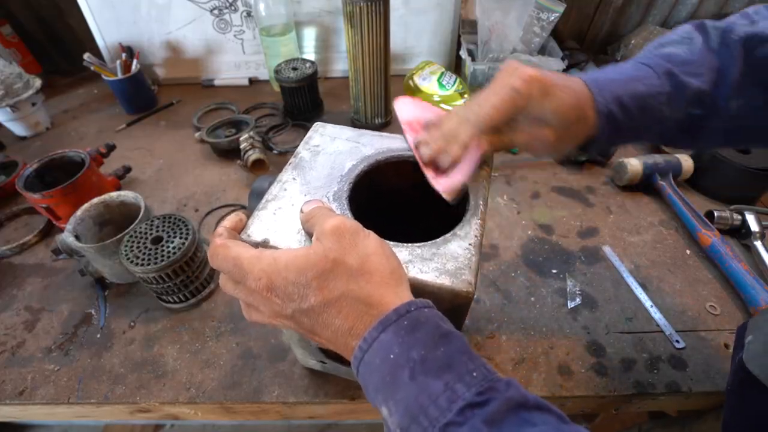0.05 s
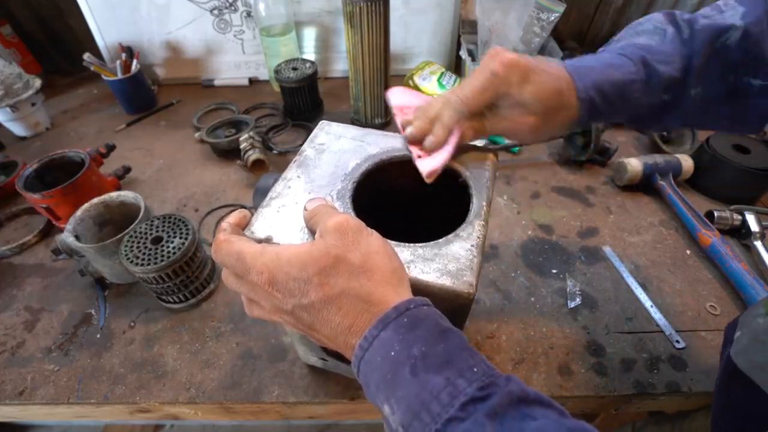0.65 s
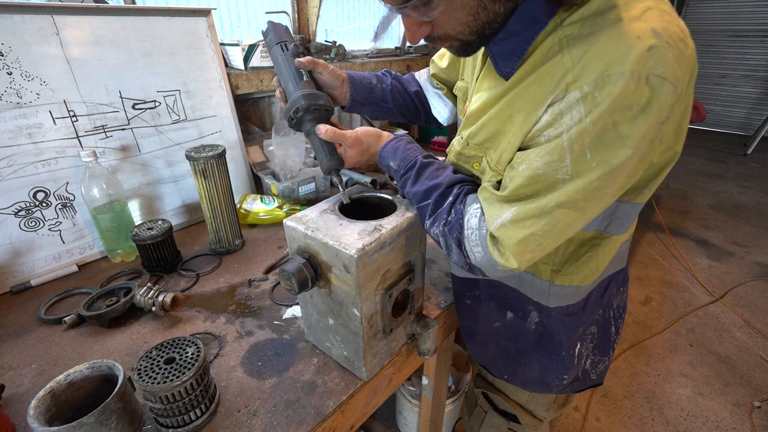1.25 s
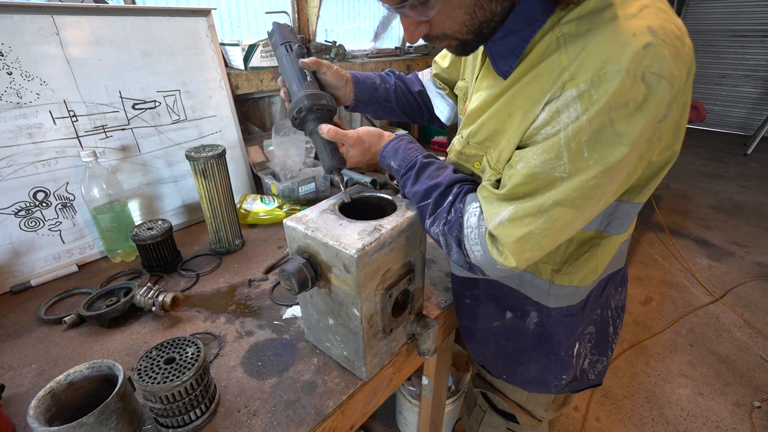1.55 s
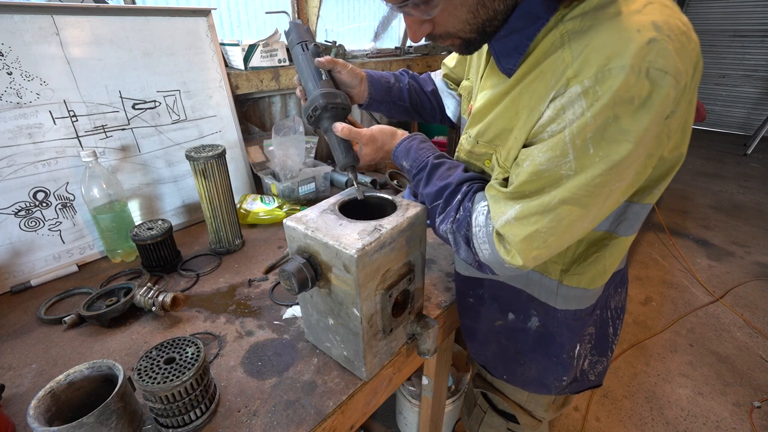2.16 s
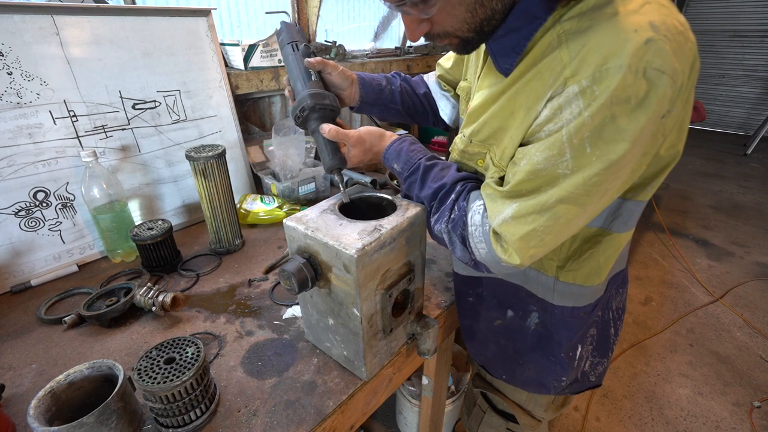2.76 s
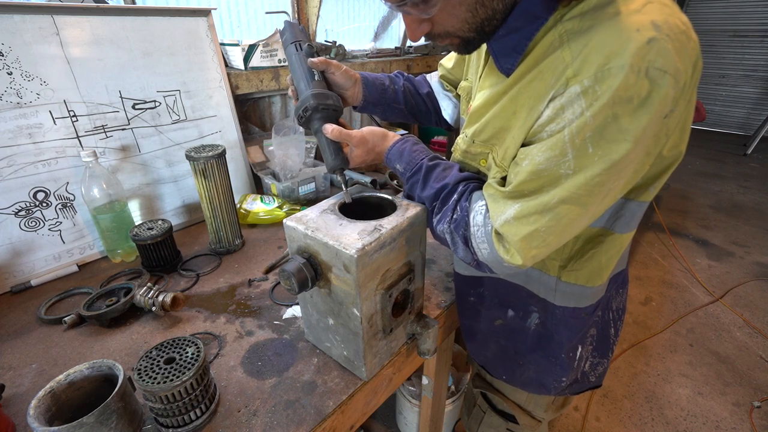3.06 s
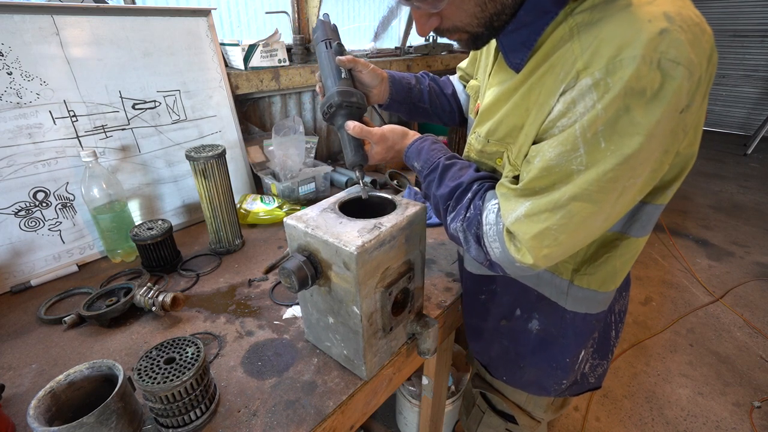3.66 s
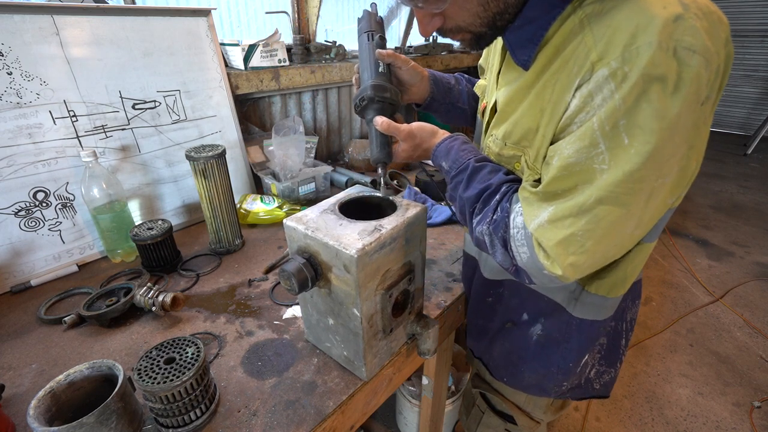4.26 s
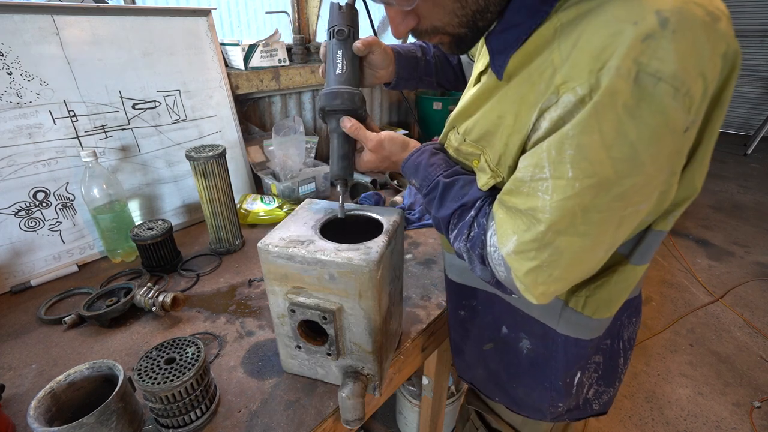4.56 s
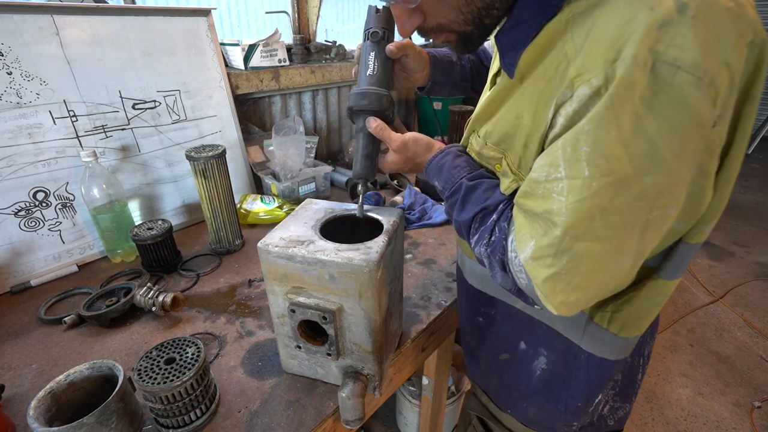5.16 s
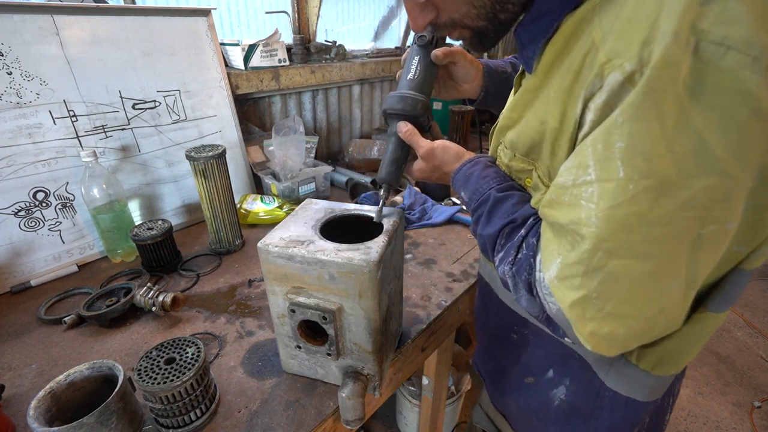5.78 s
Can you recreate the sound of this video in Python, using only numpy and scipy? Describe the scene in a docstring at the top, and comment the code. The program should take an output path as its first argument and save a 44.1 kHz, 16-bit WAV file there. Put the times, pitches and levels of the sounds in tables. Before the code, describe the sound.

Fast, hissing scrubbing on metal with a few knocks cuts abruptly to a small grinder's steady whine, with shrill ringing and chatter.

```python
"""A workshop: an abrasive pad scrubs a hollow aluminium casting in quick strokes as it knocks on the bench.
Then, abruptly, a die grinder works the rim. Its shaft hums and sags under load; the bit strikes once
a turn, makes the walls sing, tears off chips and at times chatters or squeals. Cooling air hisses from
the motor. Late on, the sound cuts abruptly to later, slightly louder grinding. The shop murmurs below."""
import sys
import numpy as np
from scipy import signal
from scipy.fft import rfft, irfft
from scipy.io import wavfile

SR = 44100
rng = np.random.default_rng(int(sys.argv[2]) if len(sys.argv) > 2 else 0)


def pcm_store(signal):
    """Save signal as 16-bit PCM."""
    levels = np.round(np.clip(np.atleast_2d(signal), -1, 1) * 32767)
    wavfile.write(sys.argv[1], SR, levels.astype(np.int16).T)


N = 260983
TIME = np.arange(N) / SR
GRINDER_START_S, CUT_S = 1.125, 4.344
MAINS_RIPPLE_HZ = 100

# Lines of the strike. Each row: shaft multiple, relative level in dB.
STRIKE_LINES = [(2, -39.5), (3, -45), (4, -42.5), (5, -37.5), (6, -41), (7, -36.5), (8, -31), (9, -32),
                (10, -36), (11, -34), (12, -33), (13, -39)]
# Wall rings. Each row: start and end in seconds, driving shaft multiple, relative level in dB.
WALL_RINGS = [(1.6, 1.827, 5, -29), (1.607, 1.903, 9, -19.5), (1.71, 1.978, 6, -27), (1.8, 2.44, 4, -35),
              (1.993, 2.44, 3, -35.5), (2.0, 2.78, 7, -32), (2.38, 2.76, 11, -24), (2.528, 2.807, 9, -19.5),
              (2.984, 3.633, 9, -21), (3.196, 3.62, 8, -24.5), (3.46, 3.815, 5, -21.5),
              (3.755, 4.334, 2, -33), (4.3, 4.674, 3, -29), (4.3, 4.7, 8, -31.5), (4.456, 5.0, 13, -23),
              (4.76, 4.982, 5, -26.5), (4.82, 4.955, 10, -20.2), (4.83, 5.3, 9, -26.5),
              (4.98, 5.25, 4, -33), (5.423, 5.674, 11, -22)]

def singing_rim(shaft):
    """The bit strikes once a turn, giving a stack of lines; a driven wall lifts one into a shrill ring."""
    touch_db = np.interp(TIME, [1.55, 1.75], [-6, 0])
    bouncing = np.minimum(sum(window(start, end, edge_s=0.035) for start, end, _, _ in BOUNCE_RUNS), 1)
    after_cut = TIME >= CUT_S  # strike 1 dB louder from here
    strike_db = 1.14 * bite_db() + touch_db - 3.5 * bouncing + after_cut - 2.5
    torque_ripple = 0.0079 * np.sin(2 * np.pi * MAINS_RIPPLE_HZ * TIME)
    skid = 0.032 * walk(27) + 0.01 * walk(200)
    contact = shaft + torque_ripple + skid
    rings, out = [], 0
    for start, end, sung, db in WALL_RINGS:
        same_side = after_cut == ((start + end) / 2 > CUT_S)  # no ring crosses the cut
        growth_db = np.interp(TIME, [start, end], [-1.75, 1.75])
        rings.append((round(sung), same_side * undb(db + growth_db) * window(start, end, edge_s=0.082)))
    for multiple, db in STRIKE_LINES:
        k = round(multiple)
        strike = undb(db + strike_db + 2 * walk(4.9) + 3.3 * walk(19))
        # a ring also lifts both neighbours, 16 dB weaker
        ring_power = sum((gain * undb(-16 * abs(sung - k))) ** 2
                         for sung, gain in rings if abs(sung - k) <= 1)
        power = strike ** 2 + ring_power * undb(2 * walk(25)) ** 2
        out += np.sqrt(2 * power) * np.sin(k * contact + rng.uniform(0, 2 * np.pi))
    return out

# Bit bouncing. Each row: start and end in seconds, bounce rate in Hz, relative level in dB.
BOUNCE_RUNS = [(2.33, 2.53, 120, -28.5), (3.556, 3.766, 127, -28), (3.754, 3.928, 112, -25.5),
               (3.935, 4.23, 112.3, -30.5), (4.504, 4.602, 102.4, -26.5), (5.22, 5.68, 105.8, -34.5),
               (5.68, 5.95, 106.9, -30)]
# Wall modes. Each row: frequency in Hz, width in Hz, gain in dB.
WALL_MODES = [(906, 29, 9), (1654, 39, 15.5), (1913, 66, 8.5), (2470, 73, 7), (2660, 50, 12.5),
              (3230, 9.5, 18), (3950, 130, 5), (4670, 380, 9), (5630, 330, 9.5), (6320, 100, 8.5),
              (6450, 120, -1), (9800, 200, 3)]

def chatter(shaft):
    """Bouncing modulates the strikes: side tones flank every line and rattle the walls."""
    contact = shaft + 0.05 * walk(30)
    strikes = sum(np.cos(k * contact + rng.uniform(0, 2 * np.pi)) for k in range(1, 20))
    wander, bounces = 0.011 * walk(11.4), 0
    for start, end, hz, db in BOUNCE_RUNS:
        bounce = phase(hz * (1 + wander))
        pulse = np.cos(bounce) + 0.5 * np.cos(2 * bounce)
        bounces += undb(db) * window(start, end, edge_s=0.047) * pulse
    rattle = resonate(strikes * bounces * undb(2.5 * walk(11)), WALL_MODES)
    return undb(4.5) * rattle / np.std(resonate(strikes, WALL_MODES))

# Bit on a sharp edge. Each row: start and end in seconds, relative level in dB.
SHARP_EDGES = [(2.37, 2.747, -46.5), (3.126, 3.5, -46.5), (3.75, 3.953, -47), (4.7, 5.7, -49),
               (5.873, 6, -37)]

def squeal(shaft):
    """A sharp edge hardens the strike and lifts its highest lines."""
    gain = undb(bite_db() - 54)
    for start, end, db in SHARP_EDGES:
        gain += undb(db) * window(start, end, edge_s=0.015)
    contact, lines = shaft + 0.016 * walk(30), 0
    for multiple in range(14, 31):
        db = 1 - 1.15 * max(multiple - 20, -3) + 3.5 * walk(8)
        lines += undb(db) * np.sin(multiple * contact + rng.uniform(0, 2 * np.pi))
    return gain * lines

# Rasp of the chips. Each row: frequency in Hz, gain in dB.
RASP_SPECTRUM = [(400, -28), (750, -15), (950, 3), (1300, -6), (2600, 0.5), (3300, 1.5), (4200, 8),
                 (5600, 6.5), (6600, 4.5), (7300, -1.5), (8800, 3.5), (10500, -22), (16000, -31)]

def rasp(shaft):
    """Chips tear off in a burst on every turn."""
    chips = grit(per_second=14000, spread_db=3) * (1 + 0.5 * np.cos(shaft))
    return colour(chips, RASP_SPECTRUM) * undb(bite_db() - 27 + walk(36))

# Hand easing off. Each row: centre in seconds, half length in seconds, depth in dB.
HAND_EASES = [(2.877, 0.39, 2.5), (3.663, .14, 2), (4.017, .08, 6.5), (4.294, 0.085, 8.5),
              (4.933, 0.12, 1.5), (5.495, 0.1, 2.5), (5.92, 0.079, 2)]

def bite_db():
    """The bit sinks in from a light touch, then holds except where the hand eases off."""
    held = np.interp(TIME, [1.35, 2], [1, 4.5])
    return held - sum(db * np.exp(-((TIME - at) / half_s) ** 2) for at, half_s, db in HAND_EASES)

# Shaft speed, sagging under load. Each row: time in seconds, turns per second.
SHAFT_SPEED = [(1.62, 530.5), (2.15, 523.4), (2.65, 518.7), (3.12, 517.8), (3.58, 514.1), (3.78, 510.0),
               (4.342, 506.3), (4.346, 521.8), (4.7, 519.7), (4.95, 515.1), (5.4, 509.4), (5.92, 506.8)]
# Shaft hum before the cut. Each row: time in seconds, level in dB.
HUM_BEFORE_CUT = [(1.15, -34.5), (2.14, -31), (2.21, -37), (3.22, -36.5), (3.48, -52.5), (3.9, -43.5),
                  (3.99, -62), (4.15, -45), (4.32, -42)]
# Shaft hum after the cut. Each row: time in seconds, level in dB.
HUM_AFTER_CUT = [(4.37, -32.5), (4.938, -38), (4.976, -45.5), (5.436, -39), (5.64, -51), (5.678, -39),
                 (5.918, -39.5)]

def motor(shaft):
    """The unbalanced shaft hums; its overtones and the commutator whine weaken under load."""
    hum_db = np.where(TIME < CUT_S, curve(HUM_BEFORE_CUT), curve(HUM_AFTER_CUT))
    overtones = undb(-38.5) * sum(np.sin(k * shaft) for k in (3, 6, 9))
    whine = undb(-40.5 + 2.5 * walk(12)) * np.sin(24 * shaft)
    free_running = np.interp(curve(SHAFT_SPEED), [510, 530], [0.55, 1])
    return np.sqrt(2) * (undb(hum_db) * np.sin(shaft) + free_running * (overtones + whine))

# Vent hiss, dipping as the grinding gets loud. Each row: time in seconds, relative level in dB.
HISS_LEVEL = [(1.13, -29), (1.7, -28.5), (2.2, -31), (4.2, -32.5), (4.7, -31.5), (5.9, -31.5)]
# Vent hiss. Each row: frequency in Hz, gain in dB.
VENT_SPECTRUM = [(250, -24), (450, -14.5), (640, -10), (800, -10.5), (950, -6.5), (1550, -2.5), (2100, -7),
                 (3000, -3), (4000, -12.5), (4900, -1), (6200, -1.5), (7300, -3.5), (8600, 0.5),
                 (10500, -9), (13000, -14), (16000, -21)]

def cooling_air():
    """The fan blows air that throbs with the mains."""
    ripple = 1 + 0.12 * np.sin(2 * np.pi * MAINS_RIPPLE_HZ * TIME)
    return colour(noise(), VENT_SPECTRUM) * undb(curve(HISS_LEVEL) + 8) * ripple

# Arm pressure. Each row: time in seconds, relative level in dB.
ARM_PRESSURE = [(0, -11.5), (.58, -11), (.69, -13.5), (.78, -11.5), (.97, -11.5), (1.06, -14.5)]
# Grit catching an edge. Each row: start in seconds, relative level in dB.
GRIT_CATCHES = [(.04, -12), (0.482, -13)]
# Pad hiss. Each row: frequency in Hz, gain in dB.
PAD_SPECTRUM = [(500, -45), (1000, -25), (1700, -22), (3000, -8.5), (3800, 0.5), (4600, 2.5), (6100, 2.5),
                (7200, -3.5), (8900, -0.5), (10500, -8.5), (13300, -8.5), (16000, -20)]
# Rub of the pad's backing. Each row: frequency in Hz, gain in dB.
BACKING_SPECTRUM = [(200, -3), (400, -4), (620, -7), (1000, -2), (1350, -4.5), (1700, 3.5), (2700, 0),
                    (4000, 1), (9000, -15), (16000, -30)]
# Modes of the hand-held casting. Each row: frequency in Hz, width in Hz, gain in dB.
CASTING_MODES = [(722, 7.5, -3), (827, 6.6, 0.5), (925, 14, 0.5), (1206, 6.1, 0.5), (1535, 27, -4),
                 (1690, 11, -1), (2590, 120, -4)]

def scrubbing(stroke_s=0.069, period_s=0.0936, return_lag_s=0.0098):
    """Each stroke drags hissing grit over the metal; a dull rub and the casting's ring carry on between."""
    k = np.arange(12)
    centres_s = 0.027 + k * period_s + k % 2 * return_lag_s
    strokes = sum(window(at - stroke_s / 2, at + stroke_s / 2, edge_s=0.033) for at in centres_s)
    drag = undb(-14 - 7 * TIME)
    force = np.maximum(drag, undb(curve(ARM_PRESSURE)) * strokes)
    for start, db in GRIT_CATCHES:
        force += undb(db) * fade(start, decay_s=0.0063)
    scrape = grit(per_second=24000, spread_db=-0.5) * force * undb(0.81 * walk(59))
    hiss = undb(-3.5) * colour(scrape, PAD_SPECTRUM) * np.std(scrape)
    friction = noise() * np.sqrt(force) * undb(-2.5 * TIME)
    rub = undb(-15.5) * colour(friction, BACKING_SPECTRUM) * np.std(friction)
    return hiss + rub + undb(-4.5) * resonate(friction, CASTING_MODES)

# Casting tipping onto the bench. Each row: start in seconds, thud drive in dB, clang drive in dB.
BENCH_KNOCKS = [(.005, -22, -28), (0.061, -22, -9.5), (.122, -9, -25), (.239, -19, -7.5), (.304, -20, -29),
                (0.483, -12, -32)]
# Bench top modes. Each row: frequency in Hz, width in Hz, gain in dB.
BENCH_MODES = [(193, 20, -3.5), (224, 25, -1), (487, 18, -11.5)]

def bench(rebound_s=0.036, loss_db=4.5):
    """The casting clangs, thuds and rocks on the wooden top."""
    thud_drive = sum(undb(db - k * loss_db) * fade(start + k * rebound_s, decay_s=0.0092)
                     for start, db, _ in BENCH_KNOCKS for k in range(3))
    clang_drive = sum(undb(db) * fade(start, decay_s=0.011) for start, _, db in BENCH_KNOCKS)
    thuds = undb(22) * resonate(noise() * thud_drive, BENCH_MODES)
    clangs = undb(16.5) * resonate(noise() * clang_drive, CASTING_MODES[:4])
    return thuds + clangs

# Low rumble. Each row: frequency in Hz, gain in dB.
RUMBLE_SPECTRUM = [(8.8, -32), (15, 9), (32, 9.5), (101, -8), (178, 4), (222, -0.5), (258, 4), (284, -12),
                   (400, -21), (520, -39), (880, -120)]

def rumble():
    """Low handling or wind rumble under the scrubbing."""
    return undb(-34.5) * colour(noise(), RUMBLE_SPECTRUM)

# Machine hums. Each row: start and end in seconds, frequency in Hz, level in dB.
MACHINE_HUMS = [(1.1, 4.33, 47, -63.5), (4.34, 8.1, 85, -62.5), (4.34, 6, 160, -70)]
# Shop murmur. Each row: frequency in Hz, gain in dB.
MURMUR_SPECTRUM = [(20, -12), (40, -10.5), (90, -1.5), (150, -5.5), (220, 0), (400, -10), (900, -16.5)]

def shop():
    """Machines hum faintly in a low murmur."""
    hums = 0
    for start, end, hz, db in MACHINE_HUMS:
        tone = np.sin(phase(hz * (1 + 0.016 * walk(6.4))))
        hums += undb(db) * window(start, end, edge_s=0.03) * tone
    return np.sqrt(2) * hums + undb(-55.5) * colour(noise(), MURMUR_SPECTRUM)

def room(x, wet_db, t60_s):
    """Short reflections from bench and walls comb the spectrum."""
    tail = rng.standard_normal(SR // 4) * undb(-60 * TIME[:SR // 4] / t60_s)
    wet = signal.fftconvolve(x, tail / np.linalg.norm(tail))[:N]
    return (x + undb(wet_db) * wet) / np.hypot(1, undb(wet_db))

def undb(db):
    """Decibels to gain."""
    return 10 ** (np.asarray(db) / 20)

def unit_rms(x):
    """Scale to rms one."""
    return x / np.sqrt(np.mean(x ** 2))

def curve(rows):
    """Join (seconds, value) rows by straight lines."""
    return np.interp(TIME, *np.transpose(rows))

def window(start, end, edge_s):
    """Gate with linear edges."""
    return np.clip(np.minimum(TIME - start, end - TIME) / edge_s + 0.5, 0, 1)

def fade(start, decay_s):
    """Sudden onset, exponential decay."""
    return (TIME >= start) * np.exp(-np.abs(TIME - start) / decay_s)

def noise():
    """White noise."""
    return rng.standard_normal(N)

def walk(rate_hz):
    """Smooth random drift, rms one, rolled off above rate_hz."""
    hz = np.arange(N // 2 + 1) * SR / N
    return unit_rms(irfft(rfft(noise()) / (1 + (hz / rate_hz) ** 4), N))

def colour(x, spectrum):
    """Shape by (Hz, dB) rows, rms one."""
    hz, db = np.transpose(spectrum)
    bins_hz = np.maximum(np.arange(N // 2 + 1) * SR / N, 1)
    gain = undb(np.interp(np.log(bins_hz), np.log(hz), db))
    return unit_rms(irfft(rfft(x) * gain, N))

def resonate(x, modes):
    """Parallel resonators."""
    return sum(undb(db) * signal.lfilter(*signal.iirpeak(hz, hz / width, SR), x)
               for hz, width, db in modes)

def grit(per_second, spread_db):
    """Dense tiny grain impacts of random size."""
    hits = rng.random(N) < per_second / SR
    return unit_rms(hits * noise() * undb(spread_db * np.minimum(rng.exponential(size=N), 5)))

def phase(hz):
    """Rate in Hz to phase in radians."""
    return 2 * np.pi * np.cumsum(hz) / SR

def scene():
    """Scrubbing gives way at once to grinding over the shop's murmur; both channels alike."""
    shaft = phase(curve(SHAFT_SPEED) * (1 + 0.00042 * walk(8.5)))
    hiss = room(cooling_air() + rasp(shaft), wet_db=-9, t60_s=0.12)
    grinding = motor(shaft) + singing_rim(shaft) + squeal(shaft) + chatter(shaft) + hiss
    grinder_on = np.clip((TIME - GRINDER_START_S) / 0.002, 0, 1)
    mono = (1 - grinder_on) * (scrubbing() + bench() + rumble()) + grinder_on * grinding + shop()
    return np.array([mono, mono])

def record(dry):
    """Clip at full scale, then low-pass at 15.8 kHz."""
    lowpass = signal.ellip(10, 0.05, 60, 15800, fs=SR, output="sos")
    return signal.sosfiltfilt(lowpass, np.clip(dry, -1, 1))

dry = scene()
out = record(dry)
pcm_store(out)
```